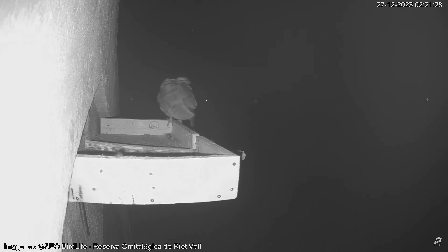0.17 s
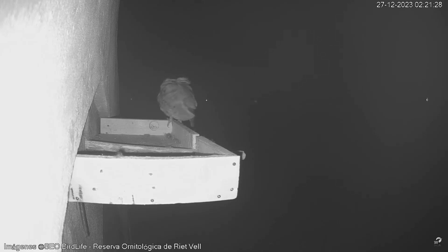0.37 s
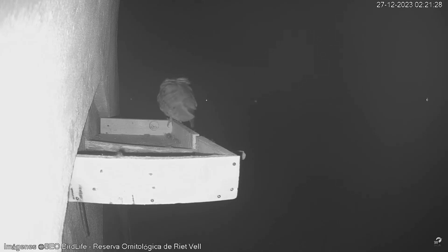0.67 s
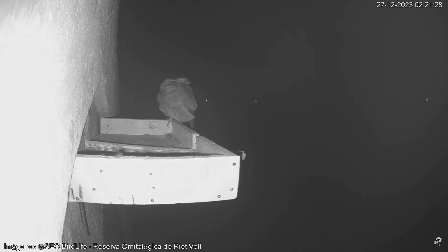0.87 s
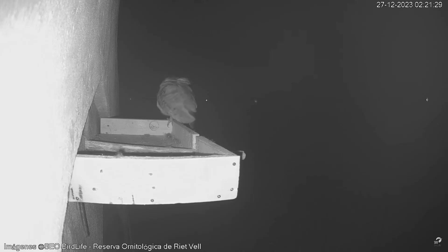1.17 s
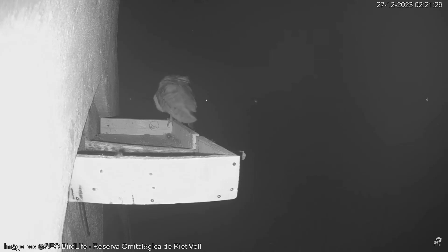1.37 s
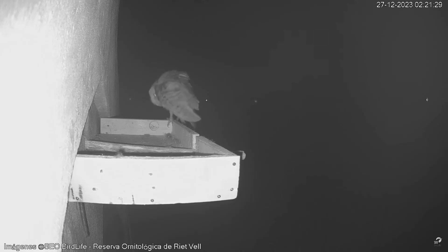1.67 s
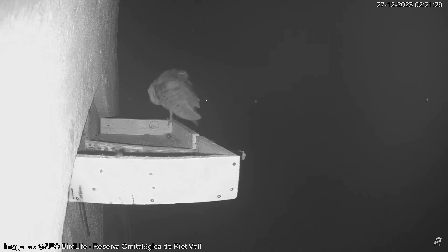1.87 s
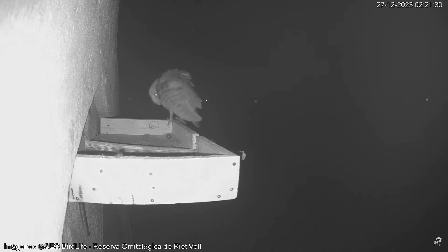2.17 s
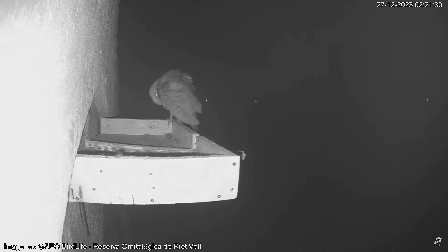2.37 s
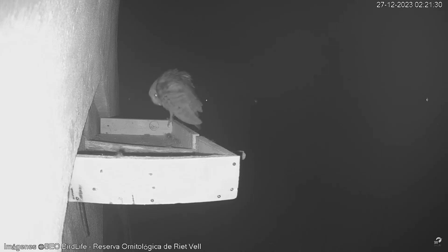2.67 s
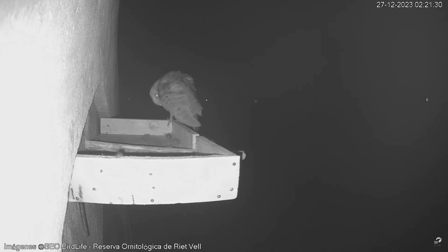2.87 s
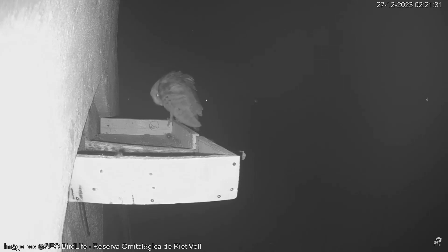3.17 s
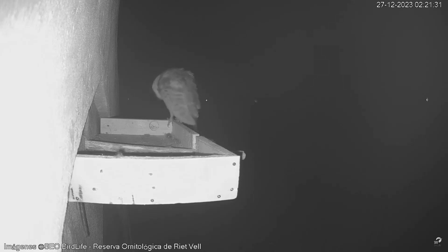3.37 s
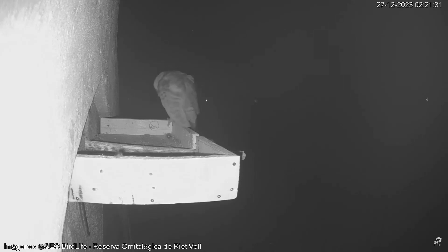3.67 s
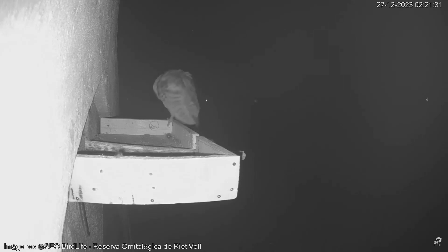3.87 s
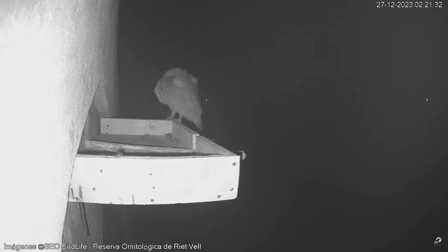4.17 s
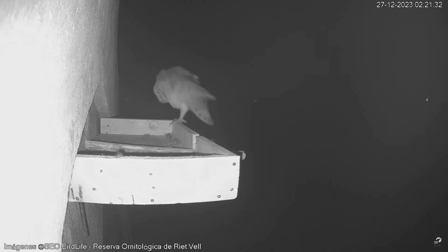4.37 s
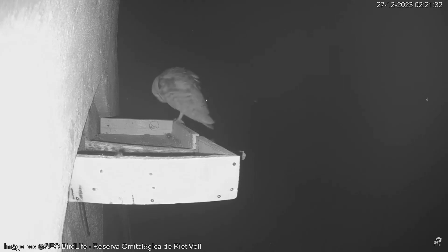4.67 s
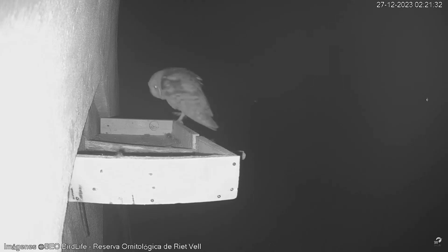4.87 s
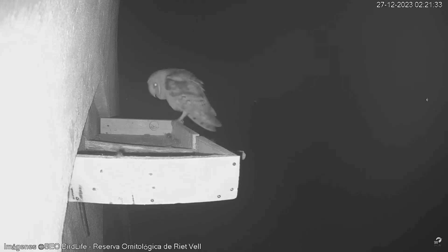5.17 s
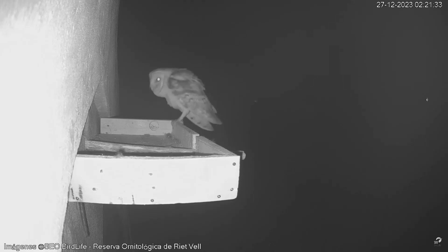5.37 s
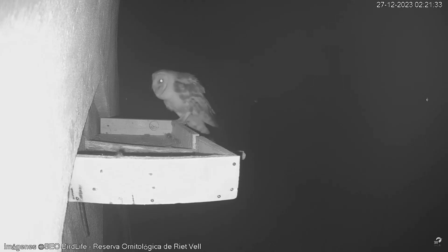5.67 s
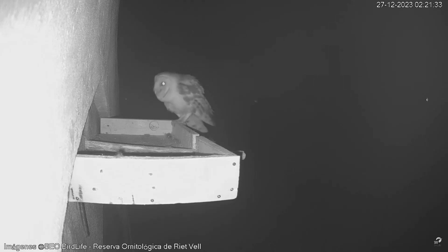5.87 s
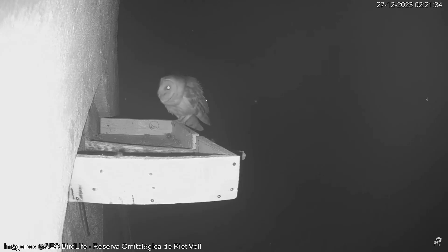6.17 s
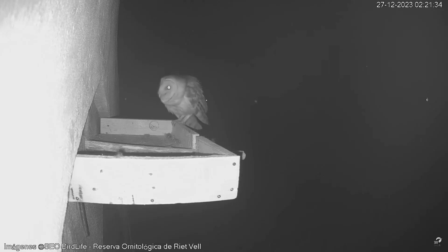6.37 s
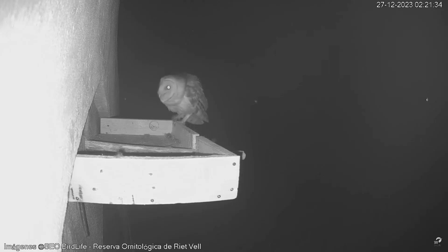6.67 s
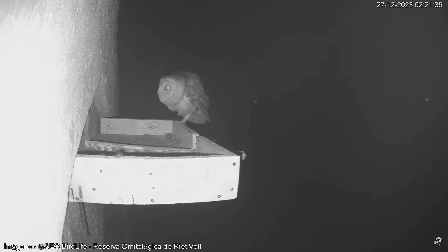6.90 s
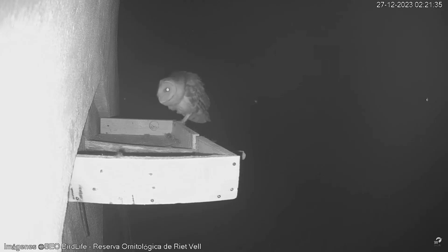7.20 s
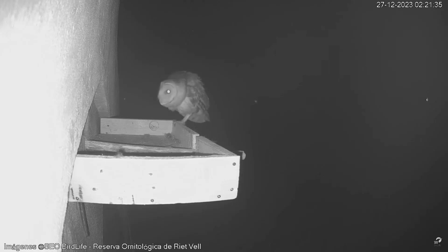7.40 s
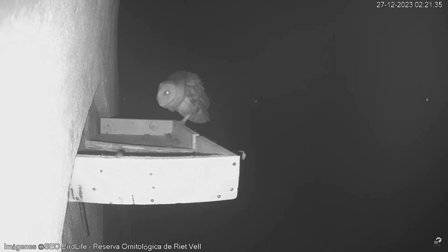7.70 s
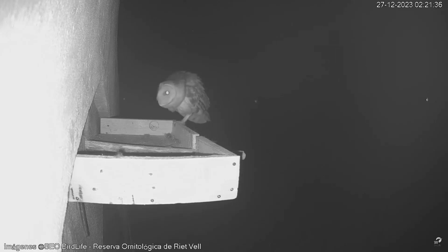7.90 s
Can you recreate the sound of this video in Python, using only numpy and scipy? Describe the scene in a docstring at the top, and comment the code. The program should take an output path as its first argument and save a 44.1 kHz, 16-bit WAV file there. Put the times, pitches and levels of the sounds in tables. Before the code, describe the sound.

A barn owl begs with rasping hisses in a wooden nest box while another shrieks thinly, then gives a long low screech breaking into a rattle.

```python
"""Barn owls in a nest box

A still night at a wooden nest box. One owl begs with a rasping hiss about every two seconds: noise through
a throat of resonances. A second cuts in with a thin, high screech, one narrow wavering resonance, then a
long low one, air chopped by membranes, that breaks into a rattle of snaps. Feet and beaks knock on the
boards as noise bursts through wood resonances; tiny gliding tones squeak. Filtered noise rumbles below."""
import sys
import numpy as np
from scipy import signal
from scipy.fft import rfft, irfft, next_fast_len
from scipy.io import wavfile
from scipy.ndimage import uniform_filter1d

SR = 44100
rng = np.random.default_rng(int(sys.argv[2]) if len(sys.argv) > 2 else 0)


def to_wav(sig):
    """Store sig (one row per channel, or 1-D mono) as 16-bit WAV at the path in sys.argv[1].

    Samples outside -1..1 are clipped; the rate is SR.
    """
    pcm = np.clip(np.atleast_2d(sig), -1, 1) * 32767
    pcm = np.round(pcm).astype(np.int16)
    wavfile.write(sys.argv[1], SR, pcm.T)  # frames by channels


N = 354519
T = np.arange(N) / SR

# faint rumble of the night air, relative spectrum: pitch_hz, level_db (per Hz)
RUMBLE = [(1, -15.5), (6, 3), (17, -10), (25, -22), (35, -23), (55, -33), (120, -41), (400, -42.5),
          (900, -51.5), (2500, -57.5), (8000, -91.5)]
RUMBLE_DB, MIC_HISS_DB = -52.5, -71.5  # rms
UNSHARED_RUMBLE_DB = -14  # each channel's own rumble, relative to the shared one
EDGE_HZ = 15750  # top of the microphone hiss

# begging hisses: start_s, length_s, crest_level_db, swell_db (up to the crest), crest_place (0-1),
# lowest_factor (on the Hz of the lowest resonance), low_db (below 2.8 kHz), hollow_db (0.9-1.5 kHz),
# ring_db (4.3-5.3 kHz), top_db (above 5.3 kHz)
HISSES = [(.52, .565, -32.8, 15.5, .72, .96, -6.3, -6, -3, -6.5),
          (2.404, .611, -36.9, 15, .51, .92, -2, 2.5, 3.3, 3),
          (3.885, .725, -35.3, 10.5, .74, .98, 1.5, 1.8, -10, -1.5),
          (5.752, .523, -30.1, 15, .6, 1, -.5, 0, 4, 5),
          (7.704, .56, -30.5, 13.5, .53, 1.05, -4.8, -5.5, .5, 4.5)]
# throat of the hissing owl: pitch_hz, width_hz, level_db, narrow_db (added while the beak is narrow)
HISS_THROAT = [(613, 235, -19.5, -5), (1187, 470, -14.5, 0.5), (1958, 480, -15.5, 2.5),
               (2604, 360, -7.5, -10.5), (3010, 270, -7.5, -5.5), (3349, 250, -2, -1),
               (3677, 332, -2.5, -4), (4100, 300, -16, 0.5), (4589, 340, -9.5, 0), (4884, 350, -7.5, -5),
               (5630, 190, -21.5, -3.5), (6244, 280, -25.5, -6), (6760, 370, -30, -4.5),
               (7360, 250, -41.5, -2.5)]
# early reflections off the boards near the hissing owl: delay_s, level_db
HISS_BOUNCES = [(.003085, -17), (.00382, -21), (.006705, -17), (.007505, -17)]
# every hiss starts fast, sags after its crest and is let go
HISS_ATTACK_S, HISS_RELEASE_S, HISS_SAG_DB = .028, .07, 7
# pace of the beak: it widens from 0.3 to 1.3 times the first, and narrows again over the second at the end
BEAK_OPENS_S, BEAK_CLOSES_S = .22, .09
# through each hiss the top brightens and all resonances rise (share of their Hz a second)
BRIGHTENS_DB_PER_S, THROAT_RISES_PER_S = 15, .03
# each resonance drifts at random: rms share of its Hz, and speed in Hz
THROAT_DRIFT, THROAT_DRIFT_HZ = .012, 7

# knocks on the box: start_s, floor_thump_db, board_db, claw_tick_db (peaks)
KNOCKS = [(1.189, -66.5, -83, -80), (1.32, -65, -76, -80), (1.831, -84, -53, -49.5),
          (2.268, -78.5, -57, -54.5), (3.213, -49, -62.5, -35), (3.584, -75, -51.5, -51),
          (3.794, -57, -51, -55), (4.18, -68, -38.5, -52), (4.565, -53, -36.5, -54), (5.058, -73, -60, -48),
          (5.75, -46.5, -48.5, -59)]
# ring of the box floor: pitch_hz, width_hz, level_db
FLOOR_MODES = [(243, 35, 1), (297, 78, -11)]
# ring of a board: pitch_hz, width_hz, level_db
BOARD_MODES = [(450, 390, -7.5), (734, 170, 4.5), (980, 200, -0.5), (1240, 310, -10), (1709, 1000, -11)]
# click of a claw: pitch_hz, width_hz, level_db
TICK_MODES = [(1670, 500, -12.5), (2750, 350, -6), (3550, 420, -1)]

# the high screech: start_s, length_s, crest_level_db, swell_db (up to the crest), crest_place (0-1)
SHRIEK = (3.261, .864, -30.3, 9.5, .42)
# its throat: pitch_hz, width_hz, level_db
SHRIEK_THROAT = [(950, 450, -43.5), (1880, 400, -37), (2768, 370, -34.5), (3055, 180, -15), (3160, 160, 0),
                 (3397, 400, -6), (3880, 81, -8.5), (4350, 260, -14), (4610, 130, -15.5),
                 (5040, 250, -21.5), (5510, 180, -24.5), (6030, 280, -25), (6640, 500, -32.5),
                 (7300, 300, -43.5), (7430, 180, -32)]
# early reflections off the boards near the screeching owl: delay_s, level_db
SHRIEK_BOUNCES = [(.003685, -10), (.00612, -15), (.00767, -17), (.009185, -17)]
SHRIEK_ATTACK_S, SHRIEK_RELEASE_S, SHRIEK_SAG_DB = .095, .045, 2.5
# it slides up into its note: share of its Hz that it starts flat, time constant in s
SHRIEK_SCOOP, SHRIEK_SCOOP_S = .08, .055

# faint squeaks: start_s, length_s, start_hz, end_hz, peak_db
SQUEAKS = [(4.786, 0.069, 1760, 1845, -67), (4.8, .07, 830, 850, -70), (5.107, 0.015, 1290, 1600, -55)]

# course of the long screech: time_s, level_db (before the trims in rasp), snap_share (of the power, 0-1)
RASP = [(5.12, -54, .02), (5.46, -38.3, .13), (5.56, -26.7, .3), (5.76, -27.8, .45), (6.33, -28.8, .32),
        (6.58, -24.5, .62), (6.69, -26, .7), (6.73, -27.3, .1), (6.842, -31.5, .05)]
# flutter of its membranes: time_s, beat_hz
FLUTTER = [(5.12, 63.15), (5.55, 58.81), (5.85, 55.75), (6.2, 51.64), (6.4, 55.34), (6.6, 50.58),
           (6.84, 50.61)]
# its throat: pitch_hz, width_hz, breathy_db, open_db, full_db
RASP_THROAT = [(544.4, 294, -3.5, -31.5, -37), (1158, 424, 6, -33.5, -21.5), (1680, 510, 7.5, -18, -32),
               (1930, 165, -9, -1, 1.5), (2404, 280, -4, 2, -13.5), (2764, 360, -3, -14, -13),
               (3203, 140, 0.5, -3.5, -17.5), (3643, 300, 2, -9, -10.5), (5060, 550, -44.5, -49.5, -35.5),
               (5590, 480, -57, -40, -44.5), (6115, 190, -55, -49, -42)]
# the hardest snaps of the rattle: time_s, level_db
SNAPS = [(6.218, -18), (6.234, -16.5), (6.384, -16.5), (6.458, -14.5), (6.476, -13.5), (6.590, -11.5),
         (6.630, -15), (6.749, -14), (6.789, -14.3), (6.809, -13)]
RASP_ATTACK_S, RASP_RELEASE_S = .095, .013
# strain builds, quickly at first, from 0 (breathy) through 1 (open) to 2 (full)
STRAIN_BUILDS_S, STRAIN_BEND = 1.13, .8
RASP_SINK_HZ = 135  # the strongest resonance starts this far above its pitch and sinks once strain passes 1


def gain_of(db):
    """Decibels to amplitude."""
    return 10 ** (np.asarray(db) / 20)


def evened(x):
    """Scales to rms 1."""
    return x / np.sqrt(np.mean(x ** 2) + 1e-20)


def add(mix, s, sound):
    """Mixes a sound in at time s."""
    part = mix[round(s * SR):][:len(sound)]
    part += sound[:len(part)]


def curves(rows):
    """Sample times of a table and each of its columns joined by straight lines."""
    s, *columns = np.transpose(rows)
    t = np.arange(s[0], s[-1], 1 / SR)
    return [t] + [np.interp(t, s, column) for column in columns]


def wander(size, hz):
    """Random drift of rms 1, its spectrum fading out smoothly around hz."""
    n = next_fast_len(2 * size)
    f = np.fft.rfftfreq(n, 1 / SR)
    smooth = np.exp(-(f / hz) ** 2)
    return evened(irfft(rfft(rng.standard_normal(n)) * smooth, n)[:size])


def resonate(x, hz, width):
    """A steep resonance of gain 1: shift hz down to zero, smooth four times, shift back."""
    turn = np.exp(2j * np.pi * np.cumsum(hz * np.ones(len(x))) / SR)
    r = np.exp(-2 * np.pi * width / SR)
    smoothed = signal.sosfilt([[1 - r, 0, 0, 1, -r, 0]] * 4, x / turn + 1e-18)
    return 2 * (turn * smoothed).real


def throat(air, resonances):
    """Air of rms 1 through (Hz, width, dB) resonances, which may move; the power stays near 1."""
    # neighbours alternate in sign
    sound = sum((-1) ** k * gain_of(db) * resonate(air, hz, width)
                for k, (hz, width, db) in enumerate(resonances))
    power = sum(gain_of(db) ** 2 * width for hz, width, db in resonances)
    return sound / np.sqrt(2 * power / SR)


def turbulence(size, rough_db, rough_hz):
    """Rushing air that comes in uneven puffs: noise whose level wanders by rough_db rms."""
    puffs = gain_of(rough_db * wander(size, rough_hz))
    return evened(rng.standard_normal(size) * puffs)


def edges(t, attack_s, release_s):
    """Gain that opens smoothly at the start of a call and closes at its end."""
    opening = np.sin(np.pi / 2 * np.minimum((t - t[0]) / attack_s, 1))
    closing = np.minimum((t[-1] - t) / release_s, 1)
    return (opening * closing) ** 2


def arch(length, crest_db, swell_db, crest, sag_db):
    """Times and gain of one push of air: it swells to a rounded crest, then sags."""
    t = T[:int(length * SR)]
    u, crest = t / length, np.clip(crest, .1, .9)
    before_db = swell_db * (1 - u / crest) ** 2
    after_db = sag_db * ((u - crest) / (1 - crest)) ** 2
    return t, gain_of(crest_db - np.where(u < crest, before_db, after_db))


def reflect(sound, bounces):
    """Adds the near reflections, which comb the spectrum finely."""
    out = np.concatenate([sound, np.zeros(SR // 50)])
    for delay_s, db in bounces:
        add(out, delay_s, gain_of(db) * sound)
    return out


def night():
    """Slow air movement at the microphone: noise shaped to a falling rumble."""
    hz, db = np.transpose(RUMBLE)
    f = np.fft.rfftfreq(N, 1 / SR)
    shape = gain_of(np.interp(np.log(f + .01), np.log(hz), db))
    return gain_of(RUMBLE_DB) * evened(irfft(rfft(rng.standard_normal(N)) * shape, N))


def hiss(s, length, crest_db, swell_db, crest, lowest, low_db, hollow_db, ring_db, top_db):
    """Unvoiced air through a wide throat; the opening beak reshapes the tone as the top brightens."""
    t, push = arch(length, crest_db, swell_db, crest, HISS_SAG_DB)
    opening = 1.3 - t / BEAK_OPENS_S
    closing = 1 - (length - t) / BEAK_CLOSES_S
    narrow = np.clip(np.maximum(opening, closing), 0, 1)
    bright_db = top_db + BRIGHTENS_DB_PER_S * (t - length / 2)
    rise = 1 + THROAT_RISES_PER_S * (t - length / 2)
    resonances = []
    for hz, width, db, narrow_db in HISS_THROAT:
        if 900 < hz < 1500:
            lift_db = hollow_db
        elif hz < 2800:
            lift_db = low_db
        elif hz < 4300:
            lift_db = 0
        elif hz < 5300:
            lift_db = ring_db
        else:
            lift_db = bright_db
        drift = THROAT_DRIFT * wander(len(t), THROAT_DRIFT_HZ)
        centre = hz * (rise + drift) * (lowest if hz < 900 else 1)
        resonances.append((centre, width, db + lift_db + narrow * narrow_db))
    air = turbulence(len(t), rough_db=-0.32, rough_hz=158.4)
    sound = evened(throat(air, resonances))
    return s, reflect(push * edges(t, HISS_ATTACK_S, HISS_RELEASE_S) * sound, HISS_BOUNCES)


def walls(x, wet_db=-33, t60=0.19, echo_s=.066, echo_db=-42):
    """The box rings on very briefly and a wall sends back one weak echo."""
    t = T[:SR // 3]
    tail = rng.standard_normal(len(t)) * gain_of(-60 * t / t60)
    tail *= gain_of(wet_db) / np.linalg.norm(tail)
    tail[round(echo_s * SR)] += gain_of(echo_db)
    return signal.oaconvolve(x, tail)[:N]


def ring(modes, rise_s, fade_s):
    """A short scuff of noise sets wood ringing; peak 1."""
    t = T[:SR // 4]
    scuff = rng.standard_normal(len(t)) * (1 - np.exp(-t / rise_s)) * np.exp(-t / fade_s)
    sound = throat(scuff, modes)
    return sound / abs(sound).max()


def knock(s, thump_db, board_db, tick_db):
    """A claw ticks, the board under it rings and the floor of the box thumps."""
    thump = gain_of(thump_db) * ring(FLOOR_MODES, rise_s=0.00068, fade_s=0.01856)
    board = gain_of(board_db) * ring(BOARD_MODES, rise_s=.0015, fade_s=0.017)
    tick = gain_of(tick_db) * ring(TICK_MODES, rise_s=.003, fade_s=0.0038)
    return s, thump + board + tick


def shriek(s, length, crest_db, swell_db, crest, waver=0.014, top_hz=3900):
    """Air through a tight throat: one narrow resonance wavers into a rough whistle."""
    t, push = arch(length, crest_db, swell_db, crest, SHRIEK_SAG_DB)
    air = turbulence(len(t), rough_db=3.7, rough_hz=70)
    tension = 1 + waver * wander(len(t), hz=25) - SHRIEK_SCOOP * np.exp(-t / SHRIEK_SCOOP_S)
    # resonances from top_hz up hold still
    resonances = [(hz * (tension if hz < top_hz else 1), width, db) for hz, width, db in SHRIEK_THROAT]
    sound = evened(throat(air, resonances))
    # the whistle limits its own swing, so its loudness stays fairly even
    power = uniform_filter1d(uniform_filter1d(sound ** 2, size=300), size=200)
    whistle = evened(sound / np.sqrt(abs(power) + 0.27))
    return s, reflect(push * edges(t, SHRIEK_ATTACK_S, SHRIEK_RELEASE_S) * whistle, SHRIEK_BOUNCES)


def squeak(s, length, start_hz, end_hz, db):
    """A tiny gliding tone: a sine under a rounded swell."""
    hz = np.linspace(start_hz, end_hz, int(length * SR))
    return s, gain_of(db) * np.hanning(len(hz)) * np.sin(2 * np.pi * np.cumsum(hz) / SR)


def rasp(snap_db=9.6, rush_top_db=-2, snap_top_db=4, rush_db=1):
    """Membranes chop the air about 55 times a second; under strain they snap shut and the screech rattles."""
    t, level_db, snap_share = curves(RASP)
    strain = 2 * np.minimum((t - t[0]) / STRAIN_BUILDS_S, 1) ** STRAIN_BEND
    snap_share = np.clip(snap_share, 1e-4, .9)
    turns = np.cumsum(np.interp(t, *np.transpose(FLUTTER))) / SR
    # the flutter is deepest midway through the strain
    depth = .5 * np.minimum(strain, 2.3 - strain).clip(0, 1)
    chop = 1 + depth * np.cos(2 * np.pi * turns)
    air = evened(chop * turbulence(len(t), rough_db=2.1, rough_hz=151.2))
    resonances = [(hz, width, np.interp(strain, np.arange(len(dbs)), dbs)) for hz, width, *dbs in RASP_THROAT]
    main = 3  # row of the strongest resonance
    hz, width, db = resonances[main]
    resonances[main] = (hz + RASP_SINK_HZ * np.minimum(2 - strain, 1), width, db)

    def brightened(top_db):
        """Trims the resonances above 4.5 kHz, which speak up as the bird pushes harder."""
        push_db = 0.8 * np.maximum(level_db - level_db.max(), -5) + 1.8
        return [(hz, width, db + (np.mean(hz) > 4500) * (top_db + push_db)) for hz, width, db in resonances]

    rush_gain = gain_of(level_db + rush_db) * np.sqrt(1 - snap_share)
    rush = rush_gain * throat(air, brightened(rush_top_db))
    rattle_db = level_db + 10 * np.log10(snap_share) + snap_db
    rattle = snaps(t, turns, rattle_db, brightened(snap_top_db))
    return t[0], (rush + rattle) * edges(t, RASP_ATTACK_S, RASP_RELEASE_S)


def snaps(t, turns, snap_db, resonances, spread_db=1.0, length_s=0.0017, smear=0.54):
    """Each closure of the membranes swells the throat's resonances for a few milliseconds."""
    beats = np.flatnonzero(np.diff(np.floor(turns)))
    chance = rng.standard_normal((len(beats), 2))
    hard_s = np.transpose(SNAPS)[0]
    rows = []
    for i, (late, loud) in zip(beats, chance):
        # beats close to a hard snap give way to it
        if abs(hard_s - t[i]).min() > .008:
            rows.append((t[i] + .0015 + .0006 * late, snap_db[i] + spread_db * loud))
    rows = rows + SNAPS
    swell = sum(gain_of(db) * np.exp(-.5 * np.minimum(((t - s) / length_s) ** 2, 60)) for s, db in rows)
    tones = 0
    for hz, width, db in resonances:
        # the higher a resonance, the less steady its phase
        jitter = smear * (np.mean(hz) / 2000) ** 2 * wander(len(t), hz=112.4)
        phase = 2 * np.pi * np.cumsum(hz * np.ones(len(t))) / SR
        tones = tones + gain_of(db) * np.cos(phase + jitter)
    return swell * tones / np.sqrt(sum(gain_of(db) ** 2 for hz, width, db in resonances))


def scene():
    """All the sounds of the box reach one microphone; a little of the rumble differs between the channels."""
    box = np.zeros(N)
    for row in HISSES:
        add(box, *hiss(*row))
    for row in KNOCKS:
        add(box, *knock(*row))
    add(box, *shriek(*SHRIEK))
    for row in SQUEAKS:
        add(box, *squeak(*row))
    add(box, *rasp())
    own_rumble = gain_of(UNSHARED_RUMBLE_DB) * np.array([night(), night()])
    return box + walls(box) + night() + own_rumble


def record(dry, mic_hz=7600):
    """The microphone cuts the scene off above mic_hz; each channel adds its own faint hiss up to EDGE_HZ."""
    heard = signal.oaconvolve(dry, signal.firwin(201, mic_hz, fs=SR)[None], "same")
    # raised so that the hiss keeps its level after the final cut
    hiss_gain = gain_of(MIC_HISS_DB) * np.sqrt(SR / 2 / EDGE_HZ)
    heard = heard + hiss_gain * rng.standard_normal(dry.shape)
    edge = signal.firwin(511, EDGE_HZ, window=("kaiser", 9), fs=SR)
    return signal.oaconvolve(heard, edge[None], "same")


dry = scene()
out = record(dry)
to_wav(out)
```